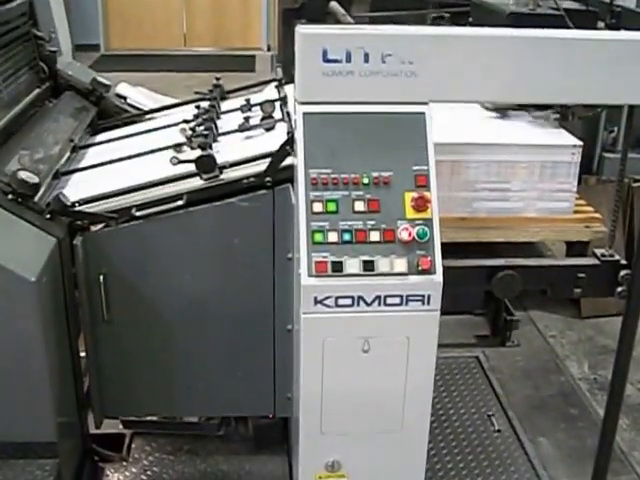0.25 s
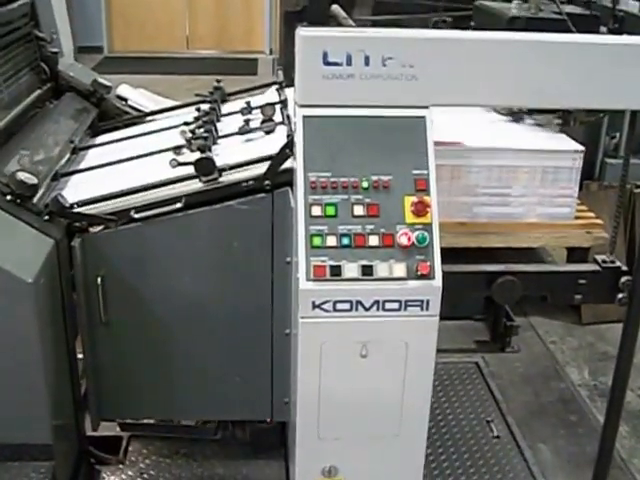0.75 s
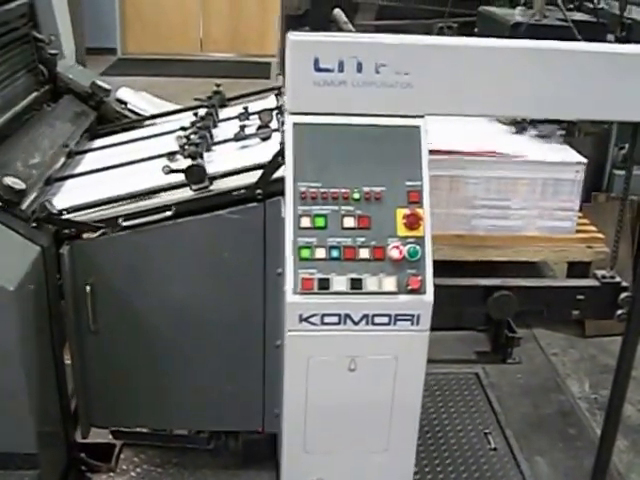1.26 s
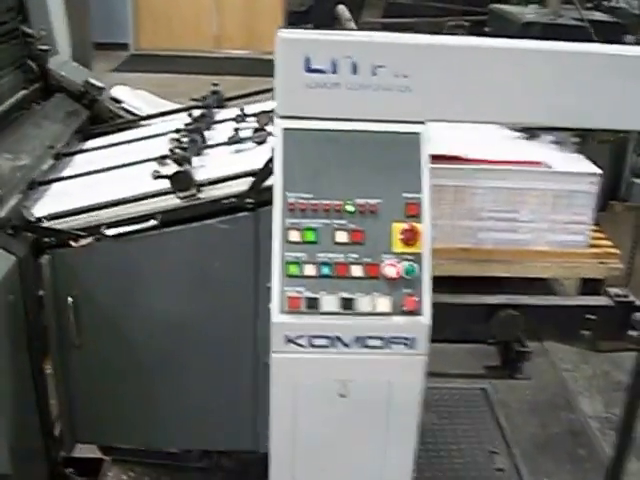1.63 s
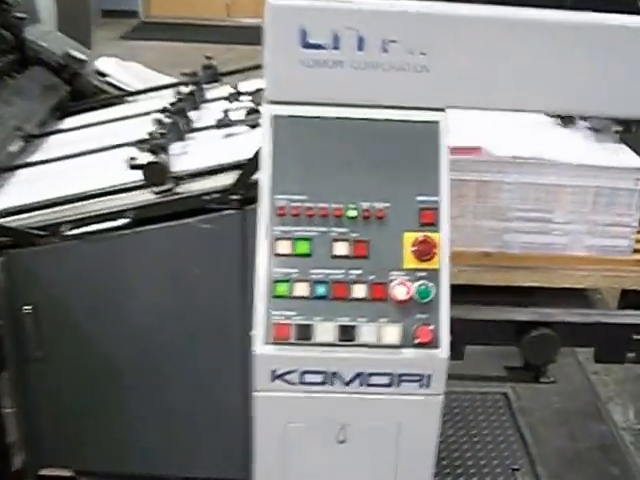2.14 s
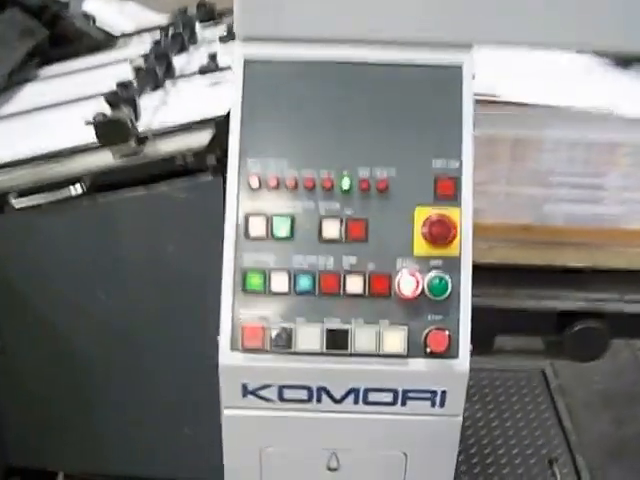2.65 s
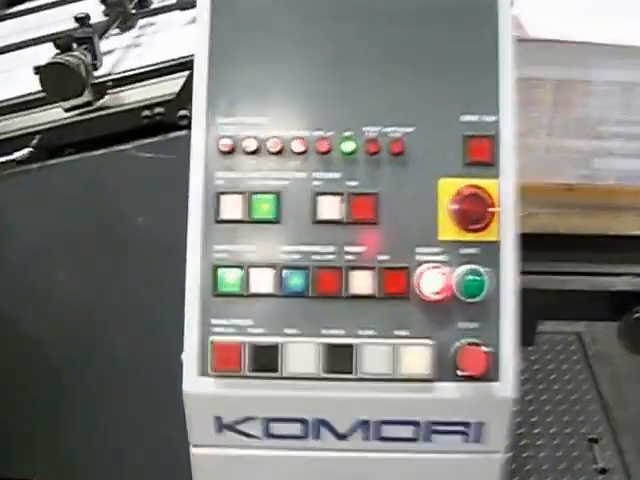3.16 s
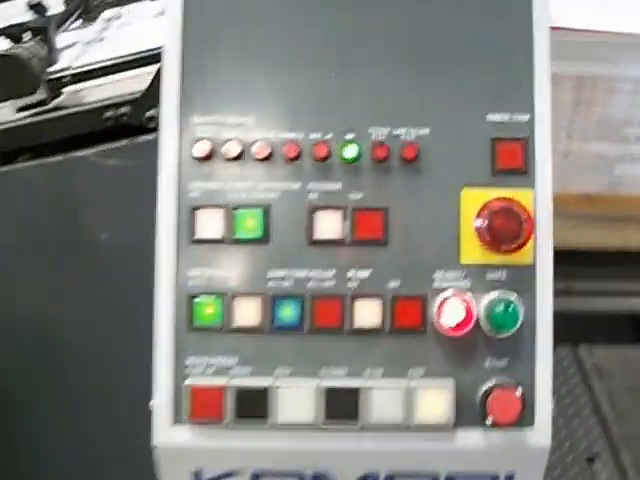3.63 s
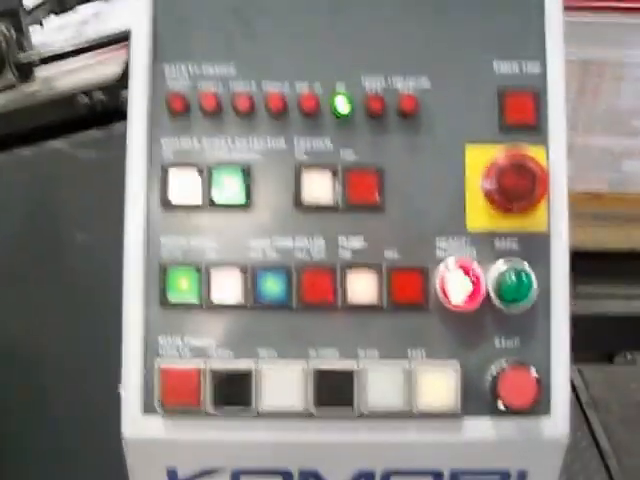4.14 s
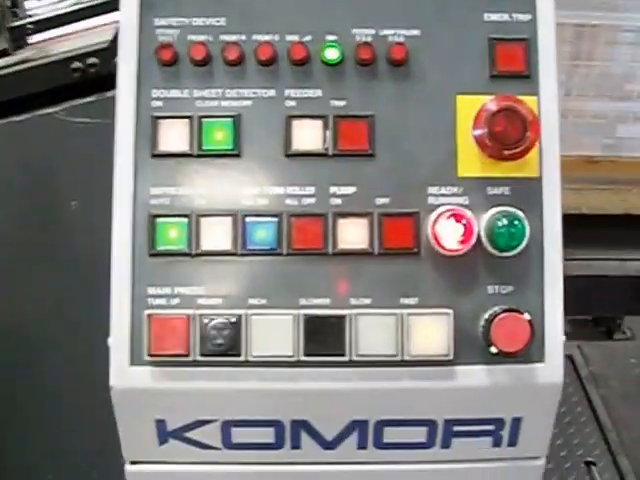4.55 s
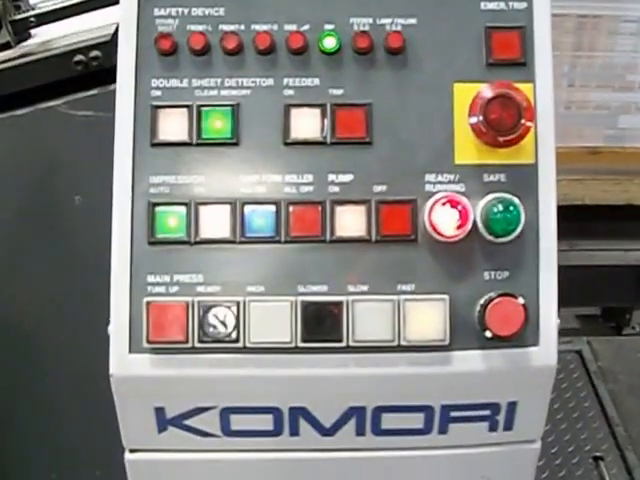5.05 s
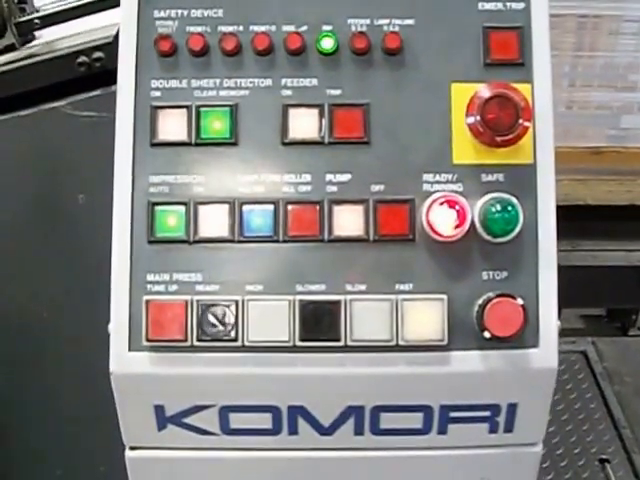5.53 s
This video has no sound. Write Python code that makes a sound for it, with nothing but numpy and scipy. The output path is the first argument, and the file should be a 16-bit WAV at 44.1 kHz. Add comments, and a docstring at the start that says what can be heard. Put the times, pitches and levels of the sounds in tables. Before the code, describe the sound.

In a workshop, a large printing press runs without pause: rumbling rollers and chains, low pump hum, wavering gear tone, thin whine and hissing air. Just over twice a second grippers clack, paper swishes, a cam knocks and a lay ticks. A small handheld camera moves towards the control panel, so the low rumble and blows become stronger after about three seconds. The sound is nearly mono, with dull, limited treble.

```python
"""Offset press, approached on foot

A sheet-fed press runs at about 8100 sheets an hour while a small camera walks up to its control desk.
Rollers and chains rumble (shaped noise and rattle), gear, fan, pulley and vane pump hum and whine
(unsteady sines), nozzles and a valve hiss (swelling noise), an edge whistles. Once a sheet grippers clack,
the sheet swishes, a cam knocks and a lay ticks; frame, guards and pawl join in (struck resonances)."""
import sys
import numpy as np
from scipy import signal
from scipy.fft import rfft, irfft
from scipy.io import wavfile

SR = 44100
rng = np.random.default_rng(int(sys.argv[2]) if len(sys.argv) > 2 else 0)


def dump_mix(stems):
    """Bounce the given channels to the path in sys.argv[1] as a 16-bit WAV at rate SR."""
    frames = np.atleast_2d(stems).T  # one column per channel
    limited = np.clip(frames, -1, 1)  # hard clip at full scale
    pcm = np.round(limited * 32767).astype(np.int16)
    wavfile.write(sys.argv[1], SR, pcm)


N = 255339
TIME_S = np.arange(N) / SR
FREQ_HZ = np.arange(N // 2 + 1) * SR / N + 1e-3  # offset avoids division by zero

# walk up to the desk: t/s, nearness/1 (0 far, 1 near)
APPROACH = [(0.0, 0.15), (1.65, 0.43), (2.0, 0.52), (2.5, 0.44), (3.25, 0.97), (5.79, 1)]

# rollers, chains and gears through the workshop: f/Hz, relative density/dB
DIN_COLOUR = [(25, -3.5), (42, -5.5), (75, -2), (110, 1), (200, 2.5), (450, 3), (950, 0), (1450, -13.5),
              (2900, -14), (4100, -18.5), (4800, -14), (5500, -20), (6000, -48.5)]
# din below and above the crossover: level/dB far, level/dB near
DIN_LOW_DB, DIN_HIGH_DB = (-29, -26.5), (-25, -25)
DIN_CROSSOVER_HZ = 1400

# main gear's mesh tone: t/s, level/dB
GEAR_LEVEL = [(0.0, -38), (1.7, -40), (2.5, -36.5), (2.9, -34), (3.25, -31.5), (3.7, -32), (4.1, -31),
              (4.4, -32), (4.7, -33.5), (5.0, -35), (5.25, -32.5), (5.38, -27), (5.52, -34.5),
              (5.79, -32.5)]
# pulley's hum: t/s, level/dB
PULLEY_LEVEL = [(0.0, -41), (1.9, -51), (2.25, -46), (2.6, -51), (2.9, -41), (3.3, -45), (3.5, -50.5),
                (5.79, -53)]
# weak, wavering tones of other motors, gears and fans: f/Hz, level/dB before trim
MOTOR_TONES = [(93, -50), (104, -49), (129, -49), (190, -48), (264, -50), (401, -47), (949, -51),
               (985, -47.5), (1061, -53), (2587, -52), (2767, -56), (5375, -59)]
GEAR_HZ, PULLEY_HZ = 738.9, 619
FAN_HZ, FAN_DB = 360, (-39.5, -45)  # level/dB far, near
MOTOR_TRIM_DB = -0.6
STANDING_WAVE_DB = 1.5  # rms swing

# pump hum, swelling and sinking through the room's standing waves: t/s, level/dB
HUM_LEVEL = [(0.0, -36), (1.35, -34), (1.8, -37), (2.4, -36.5), (3.25, -31), (3.9, -32.5), (5.79, -35)]
# two lines of the thin whine: t/s, level/dB of first order, level/dB of second order
WHINE_LEVELS = [(0.0, -47, -42.5), (0.651, -50.5, -41), (0.75, -51.5, -49), (1.03, -52, -41.5),
                (1.329, -56, -64), (1.651, -49, -47.5), (2.0, -46, -48), (2.33, -42, -58.5),
                (2.55, -52, -40.5), (2.9, -50, -65), (3.25, -48, -46), (3.549, -54, -47.5),
                (3.9, -41, -49.5), (4.3, -47, -44.5), (4.85, -42, -52), (5.4, -45, -48), (5.79, -44, -57)]
# pump overtones that change along the walk: multiple of shaft rate/1, level/dB far, level/dB near
WALK_ORDERS = [(2, -45, -40), (4, -45, -41), (5, -42.5, -48), (8, -49, -45), (10, -37.5, -47),
               (52, -55.5, -51.5), (76, -54, -60)]
# pump overtones that waver at random about one level: multiple of shaft rate/1, level/dB before trim
WAVER_ORDERS = [(12, -49), (42, -59), (46, -55), (50, -60), (56, -58), (64, -61), (96, -63), (110, -69)]
PUMP_HZ, WHINE_ORDERS, WAVER_TRIM_DB = 58.23, (44, 48), -0.3
# second motor: slower than the shaft by BEAT_HZ, level relative to the hum, in step at IN_STEP_S
BEAT_HZ, SECOND_MOTOR_DB, IN_STEP_S = 1.8, -16.5, 1.7

# resonances; width is that of one of two cascaded stages
# nozzles: f/Hz, width/Hz, level/dB
NOZZLE_MODES = [(4850, 800, 0)]
# relief valve: f/Hz, width/Hz, level/dB
VALVE_MODES = [(5650, 450, 0)]
# frame: f/Hz, width/Hz, level/dB
FRAME_MODES = [(180, 110, 3), (410, 240, 0), (690, 200, -5)]
# grippers: f/Hz, width/Hz, level/dB
GRIPPER_MODES = [(620, 690, 3), (1230, 410, -2), (2660, 1900, -1.5), (4940, 890, 1.5)]
# steel guards: f/Hz, width/Hz, level/dB
GUARD_MODES = [(340, 260, -5), (680, 400, 0), (1000, 300, -1), (1320, 280, -7), (1900, 700, -17)]
# sheet on the feed board: f/Hz, width/Hz, level/dB
SHEET_MODES = [(1880, 1400, -11), (3400, 1800, -12), (4680, 750, 0)]
# cam: f/Hz, width/Hz, level/dB
CAM_MODES = [(1250, 750, 3.5), (2300, 1400, -2.5), (3400, 900, 0), (4900, 700, -10)]
# lay: f/Hz, width/Hz, level/dB
LAY_MODES = [(2900, 2300, -15), (4150, 650, -7), (4740, 900, 0)]
# feeder pawl: f/Hz, width/Hz, level/dB
PAWL_MODES = [(2600, 2400, -12), (3370, 1400, -2.5)]

# whistle over a sharp edge, pitch wavering with the pressure: t/s, f/Hz
WHISTLE_PITCH = [(0.0, 5075), (0.25, 5085), (0.42, 5035), (0.8, 5065), (1.05, 5045), (1.3, 5095),
                 (1.56, 5010), (1.8, 5105), (2.0, 5045), (2.17, 5095), (2.43, 5030), (2.8, 5095),
                 (3.0, 5005), (3.14, 5080), (3.33, 5025), (3.6, 5060), (4.22, 5090), (4.42, 5005),
                 (4.6, 5095), (4.85, 5030), (5.3, 5065), (5.79, 5030)]
WHISTLE_DB, WHISTLE_FLUTTER_DB, WHISTLE_WAVER_HZ = -47.5, 7.5, 7  # flutter is the limit, waver is rms
VALVE_WHISTLE_HZ, VALVE_WHISTLE_DB = 5600, -56
AIR_DB, AIR_WAVER_DB = -56, 3
PUFF_DB, PUFF_AT_S, PUFF_LENGTH_S = -47, 0.058, 0.06  # once a turn
# the valve keeps a slower rhythm of its own
VALVE_DB, VALVE_FIRST_S, VALVE_PERIOD_S, VALVE_LENGTH_S = -48, 0.5, 0.925, 0.22

# heavier dull thumps in the frame: t/s, level/dB
FRAME_THUMPS = [(0.112, -25), (0.226, -22), (0.775, -25.5), (1.16, -24), (1.635, -24), (1.68, -24),
                (2.18, -22.5), (2.28, -22.5), (2.722, -21), (3.418, -20.5), (3.648, -22.5), (3.925, -22.5),
                (4.108, -20), (4.305, -21.5), (4.585, -21.5), (4.775, -22), (4.945, -19), (5.42, -22),
                (5.53, -23.5), (5.695, -20)]
# hard gripper strokes, often with one bounce: t/s, level/dB
GRIPPER_CLACKS = [(0.116, -33), (0.131, -32), (1.006, -32), (1.018, -30.5), (1.89, -29.5), (2.329, -30.5),
                  (2.336, -32), (2.795, -31), (3.219, -28.5), (3.233, -27.5), (3.663, -27), (3.677, -29),
                  (4.12, -26), (4.128, -31), (4.552, -30.5), (4.574, -30.5), (5.007, -26.5), (5.019, -28),
                  (5.437, -27), (5.451, -25.5)]
# guards slamming, mostly as the grippers close, with two more rattles early on: t/s, level/dB
GUARD_SLAMS = [(0.116, -25), (0.155, -25), (0.2, -26), (1.006, -24.5), (1.888, -24.5), (2.337, -27),
               (3.218, -22), (3.662, -20), (4.12, -26.5), (5.437, -24.5)]
# hard sheet strokes: t/s, level/dB
SHEET_SLAPS = [(0.168, -35), (0.611, -38), (1.056, -36.5), (2.385, -37.5), (2.829, -38), (3.713, -37),
               (4.157, -32.5), (4.603, -32), (5.487, -33.5)]
# hard cam strokes: t/s, level/dB
CAM_KNOCKS = [(2.017, -34), (3.35, -32.5), (3.789, -30), (4.2315, -28.5), (4.674, -31.5), (5.123, -27.5),
              (5.563, -33)]
# hard lay strokes: t/s, level/dB
LAY_TICKS = [(2.14, -38), (2.583, -29.5), (3.47, -39), (3.913, -34.5), (4.798, -38)]
# feeder pawl snapping over: t/s, level/dB
PAWL_SNAPS = [(3.577, -37.5), (4.077, -37.5), (4.626, -40), (4.969, -37), (5.046, -38)]

# one sheet per turn
SHEET_PERIOD_S, FIRST_TURN_S = 0.4434, 0.115
TURN_COUNT = np.ceil((N / SR - FIRST_TURN_S) / SHEET_PERIOD_S)
TURNS_S = FIRST_TURN_S + SHEET_PERIOD_S * np.arange(TURN_COUNT)
# soft strokes: t/s into the turn, level/dB far, level/dB near
GRIPPER_CLOSE = (0.006, -37, -34)
SHEET_ARRIVES = (0.052, -42.5, -43)
CAM_DROP = (0.126, -36.5, -39)
LAY_PULL = (0.251, -44.5, -41)
STROKE_SCATTER_DB = 1.5

CHANNEL_LAG_S = 83e-6
MIRROR_HZ, MIRROR_DB_PER_HZ, TOP_HZ = 6000, -0.021, 7300


def undb(db):
    """Decibels to gain."""
    return 10 ** (np.asarray(db) / 20)


def unit(x):
    """Scale to rms 1."""
    return x / np.sqrt(np.mean(np.abs(x) ** 2))


def curves(table):
    """Each column after the time as a value per sample."""
    time_s, *columns = np.transpose(table)
    return [np.interp(TIME_S, time_s, column) for column in columns]


def along_walk(far_db, near_db, time_s=TIME_S):
    """Level at a time, between its far and near values."""
    return far_db + (near_db - far_db) * np.interp(time_s, *np.transpose(APPROACH))


def walk(rate_hz):
    """Smooth random curve, rms 1, changing about rate_hz times a second."""
    smoothing = np.exp(-(FREQ_HZ / rate_hz) ** 2)
    return unit(irfft(rfft(rng.standard_normal(N)) * smoothing, N))


def swells(times_s, length_s):
    """Gaussian rise and fall around each time, length_s wide at 1/e."""
    return sum(np.exp(-(2 * (TIME_S - s) / length_s) ** 2) for s in times_s)


def shape(x, response):
    """Filter by a frequency response; white noise keeps its level."""
    return irfft(rfft(x) * unit(response), N)


def body(modes):
    """Response of resonances with steep skirts; neighbours swing in opposite phase."""
    response = 0
    for k, (hz, width_hz, db) in enumerate(modes):
        detuning = (FREQ_HZ / hz - hz / FREQ_HZ) * hz / width_hz
        response = response + (-1) ** k * undb(db) / (1 + 1j * detuning) ** 2
    return response


def turning(hz, wander, rate_hz):
    """Phase of something turning at a slightly unsteady speed (wander: relative rms)."""
    speed_hz = hz * (1 + wander * walk(rate_hz))
    return 2 * np.pi * (np.cumsum(speed_hz) / SR + rng.random())


def rattle(per_second, spread_db):
    """Dense tiny impacts of unequal size and random sign, rms 1."""
    hit = rng.random(N) < per_second / SR
    size = np.minimum(rng.exponential(size=N), 2)
    sign = rng.choice([-1, 1], N)
    return unit(hit * sign * undb(spread_db * size))


def strokes(hard, delay_s, far_db, near_db):
    """Strike at the same point of every turn: hard strokes, and soft ones in the other turns."""
    times_s = TURNS_S + delay_s
    scatter_db = STROKE_SCATTER_DB * rng.standard_normal(len(times_s))
    levels_db = along_walk(far_db, near_db, times_s) + scatter_db
    soft = []
    for s, db in zip(times_s, levels_db):
        turn_is_free = all(abs(s - hard_s) > SHEET_PERIOD_S / 2 for hard_s, _ in hard)
        if s < TIME_S[-1] and turn_is_free:
            soft.append((s, db))
    return soft + list(hard)


def blows(table, modes, rise_s, decay_s, room_db, room_s, chatter_db, crack_db):
    """Each contact cracks once and chatters briefly into the resonances; the workshop carries it on."""
    power, cracks = np.zeros(N), np.zeros(N)
    for s, db in table:
        age_s = np.maximum(TIME_S - s, 0)
        rise = 1 - np.exp(-age_s / rise_s)
        fall = np.exp(-age_s / decay_s) + undb(room_db) * np.exp(-age_s / room_s)
        power += (undb(db + chatter_db) * rise * fall) ** 2
        cracks[int(s * SR)] -= undb(db + crack_db)
    chatter = np.sqrt(power) * rng.choice([-1, 1], N)
    soft = 1 / np.sqrt(1 + (FREQ_HZ / 5600) ** 10)  # a contact of finite length has little top
    return shape(cracks + chatter, body(modes) * soft)


def rollers():
    """Smooth rumble with chain links and bearings rattling in it; the lows grow on coming nearer."""
    hz, db = np.transpose(DIN_COLOUR)
    colour = undb(np.interp(np.log(FREQ_HZ), np.log(hz), db)) / np.sqrt(1 + (20 / FREQ_HZ) ** 4)
    rumble = rng.standard_normal(N) * undb(0.5 * walk(13))
    chains = rattle(per_second=900, spread_db=-1) * undb(0.12 * walk(25))
    din = shape(unit(rumble + undb(-7) * chains), colour)
    low = irfft(rfft(din) / (1 + (FREQ_HZ / DIN_CROSSOVER_HZ) ** 4), N)
    high = din - low
    return low * undb(along_walk(*DIN_LOW_DB)) + high * undb(along_walk(*DIN_HIGH_DB))


def gear():
    """Mesh tone of the main gear: a sine at a slightly unsteady speed."""
    level_db, = curves(GEAR_LEVEL)
    tone = np.sin(turning(GEAR_HZ, wander=0.00055, rate_hz=1.48))
    return np.sqrt(2) * undb(level_db + 0.98 * walk(24)) * tone


def fan():
    """Drone of a fan's blades, mostly heard from afar."""
    level_db = along_walk(*FAN_DB) + STANDING_WAVE_DB * walk(2)
    return np.sqrt(2) * undb(level_db) * np.sin(turning(FAN_HZ, wander=0.002, rate_hz=4))


def pulley():
    """Hum of a pulley, rising and sinking along the walk."""
    level_db, = curves(PULLEY_LEVEL)
    tone = np.sin(turning(PULLEY_HZ, wander=0.0007, rate_hz=4))
    return np.sqrt(2) * undb(level_db + STANDING_WAVE_DB * walk(4)) * tone


def other_motors():
    """Weak tones of other motors, gears and fans, each wavering on its own."""
    tones = 0
    for hz, db in MOTOR_TONES:
        gain = undb(db + MOTOR_TRIM_DB + 2.5 * walk(1.5))
        tones = tones + gain * np.sin(turning(hz, wander=0.0007, rate_hz=4))
    return np.sqrt(2) * tones


def pump():
    """Vane pump: the shaft hums and beats with a second motor; high multiples of its rate whine."""
    hum_db, = curves(HUM_LEVEL)
    shaft = turning(PUMP_HZ, wander=0.00081, rate_hz=3.97)
    slip = 2 * np.pi * BEAT_HZ * (TIME_S - IN_STEP_S)
    second_motor = undb(SECOND_MOTOR_DB) * np.sin(shaft - slip)
    tones = undb(hum_db) * (np.sin(shaft) + second_motor)
    for order, db in zip(WHINE_ORDERS, curves(WHINE_LEVELS)):
        tones += undb(db + 0.9 * walk(25)) * np.sin(order * shaft)
    for order, far_db, near_db in WALK_ORDERS:
        level_db = along_walk(far_db, near_db) + STANDING_WAVE_DB * walk(3)
        tones += undb(level_db) * np.sin(order * shaft)
    for order, db in WAVER_ORDERS:
        phase = 2 * np.pi * rng.random()
        tones += undb(db + WAVER_TRIM_DB + 2 * walk(5.6)) * np.sin(order * shaft + phase)
    return np.sqrt(2) * tones


def nozzles():
    """Blast air hisses through resonant nozzles, wavering a little, with a puff for every sheet."""
    puffs = undb(PUFF_DB) * swells(TURNS_S + PUFF_AT_S, PUFF_LENGTH_S)
    flow = (undb(AIR_DB) + puffs) * undb(AIR_WAVER_DB * walk(2))
    return shape(flow * rng.standard_normal(N), body(NOZZLE_MODES))


def whistles():
    """Two thin, fluttering air tones: one over a sharp edge, its pitch wavering, one fainter and higher."""
    pitch_hz, = curves(WHISTLE_PITCH)
    edge_hz = pitch_hz + WHISTLE_WAVER_HZ * walk(14)
    tones = 0
    for hz, db in [(edge_hz, WHISTLE_DB), (VALVE_WHISTLE_HZ, VALVE_WHISTLE_DB)]:
        flutter_db = WHISTLE_FLUTTER_DB * np.tanh(walk(12))
        tones = tones + undb(db + flutter_db) * np.sin(turning(hz, wander=0.003, rate_hz=150))
    return tones


def frame():
    """Dull thumps of the frame as it takes the jolts."""
    return blows(FRAME_THUMPS, FRAME_MODES, rise_s=0.0074, decay_s=0.025, room_db=-20, room_s=0.059,
                 chatter_db=-3, crack_db=15)


def grippers():
    """Grippers clack shut at the start of each turn."""
    return blows(strokes(GRIPPER_CLACKS, *GRIPPER_CLOSE), GRIPPER_MODES, rise_s=0.0005, decay_s=0.008,
                 room_db=-20, room_s=0.04, chatter_db=2, crack_db=22)


def guards():
    """Steel guards slam, mostly as the grippers close, and rattle twice more early on."""
    return blows(GUARD_SLAMS, GUARD_MODES, rise_s=0.003, decay_s=0.02, room_db=-20, room_s=0.05,
                 chatter_db=-1.5, crack_db=23)


def sheets():
    """Each sheet swishes down the feed board."""
    return blows(strokes(SHEET_SLAPS, *SHEET_ARRIVES), SHEET_MODES, rise_s=0.002, decay_s=0.009,
                 room_db=-19, room_s=0.05, chatter_db=6, crack_db=21)


def cam():
    """A cam drops and knocks once a turn."""
    return blows(strokes(CAM_KNOCKS, *CAM_DROP), CAM_MODES, rise_s=0.001, decay_s=0.007,
                 room_db=-21, room_s=0.04, chatter_db=7, crack_db=21.5)


def valve():
    """A relief valve lets off air: resonant noise in slow, smooth swells."""
    opening = swells(np.arange(VALVE_FIRST_S, TIME_S[-1], VALVE_PERIOD_S), VALVE_LENGTH_S)
    return shape(undb(VALVE_DB) * opening * rng.standard_normal(N), body(VALVE_MODES))


def lay():
    """A lay pulls the sheet and ticks once a turn."""
    return blows(strokes(LAY_TICKS, *LAY_PULL), LAY_MODES, rise_s=0.001, decay_s=0.005,
                 room_db=-26, room_s=0.05, chatter_db=8.5, crack_db=22)


def pawl():
    """A pawl in the feeder snaps over now and then."""
    return blows(PAWL_SNAPS, PAWL_MODES, rise_s=0.001, decay_s=0.004, room_db=-22, room_s=0.05,
                 chatter_db=6, crack_db=19)


def scene():
    """The whole press, the same in both channels, the left a moment later."""
    running = rollers() + gear() + fan() + pulley() + other_motors() + pump()
    blown = nozzles() + whistles() + valve()
    struck = frame() + grippers() + guards() + sheets() + cam() + lay() + pawl()
    press = running + blown + struck
    left = irfft(rfft(press) * np.exp(-2j * np.pi * FREQ_HZ * CHANNEL_LAG_S), N)
    return np.array([left, press])


def record(dry):
    """The camera samples coarsely: the top treble is faintly mirrored upwards, then cut steeply."""
    kept = irfft(rfft(dry) * (FREQ_HZ < MIRROR_HZ), N)
    mirrored = rfft(kept * 2 * np.cos(2 * np.pi * 2 * MIRROR_HZ * TIME_S))
    fading = undb(MIRROR_DB_PER_HZ * np.abs(FREQ_HZ - MIRROR_HZ))  # fainter away from the mirror
    ghost = irfft(mirrored * fading, N)
    top_cut = signal.ellip(8, 0.2, 70, TOP_HZ, fs=SR, output="sos")
    return signal.sosfilt(top_cut, kept + ghost)


dry = scene()
out = record(dry)
dump_mix(out)
```